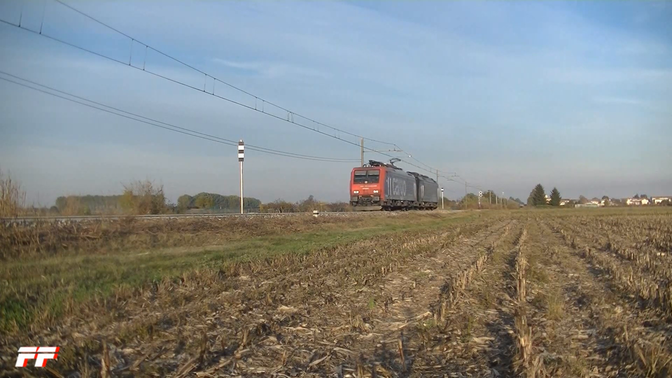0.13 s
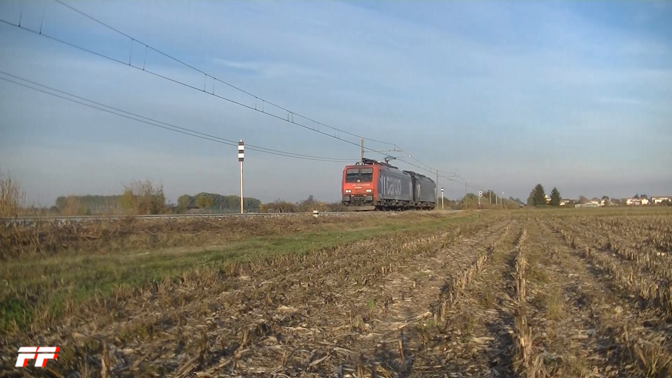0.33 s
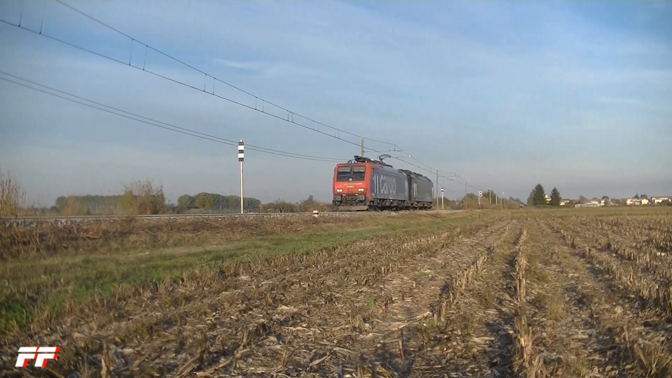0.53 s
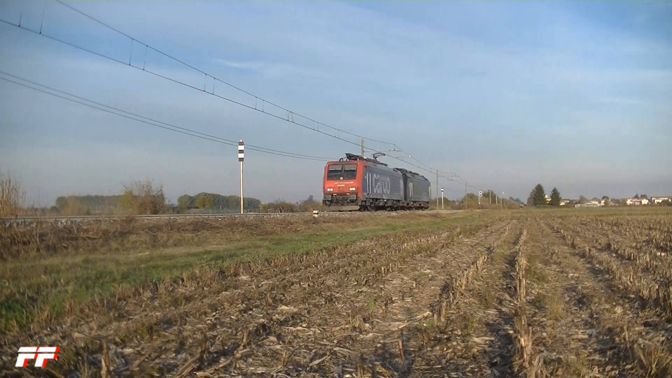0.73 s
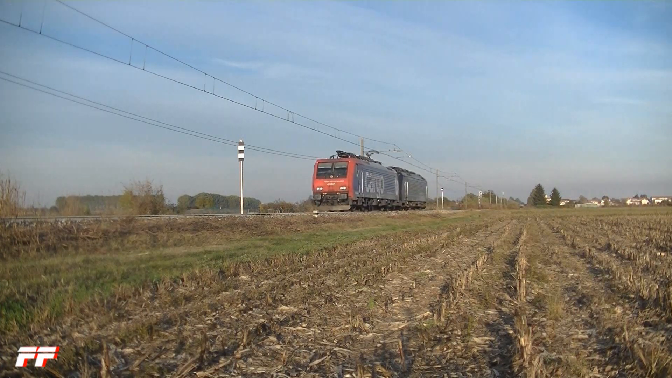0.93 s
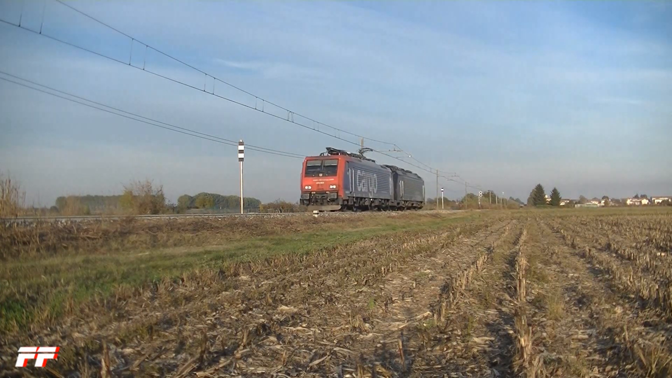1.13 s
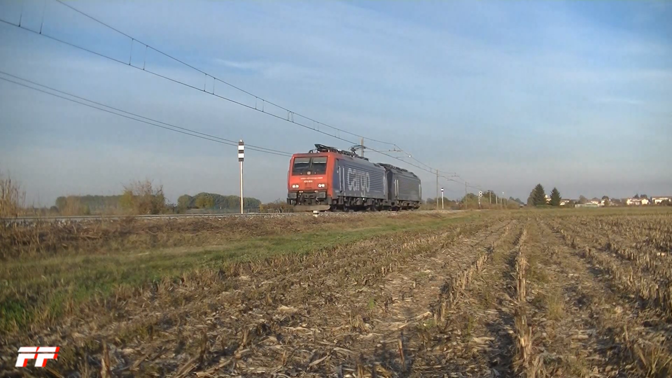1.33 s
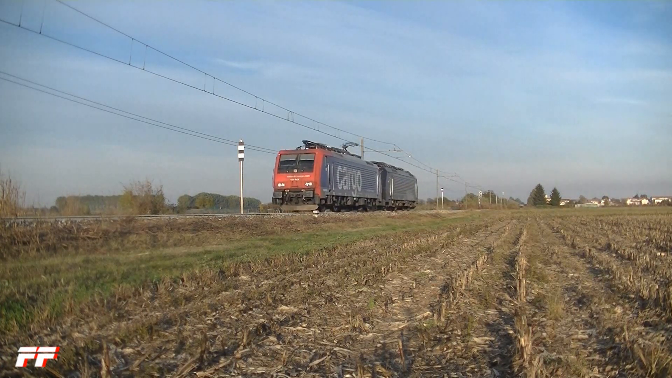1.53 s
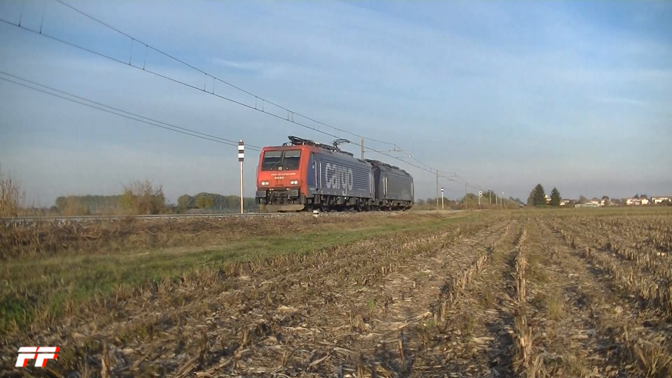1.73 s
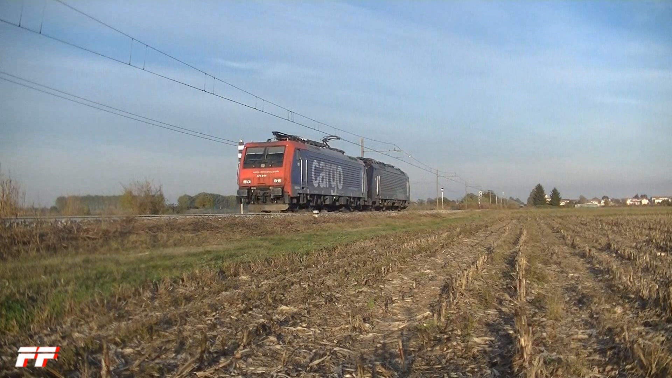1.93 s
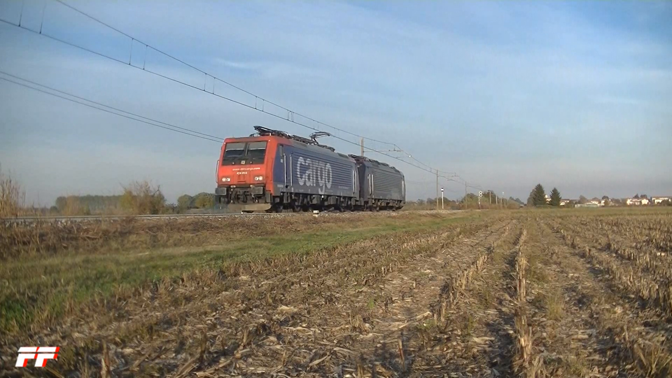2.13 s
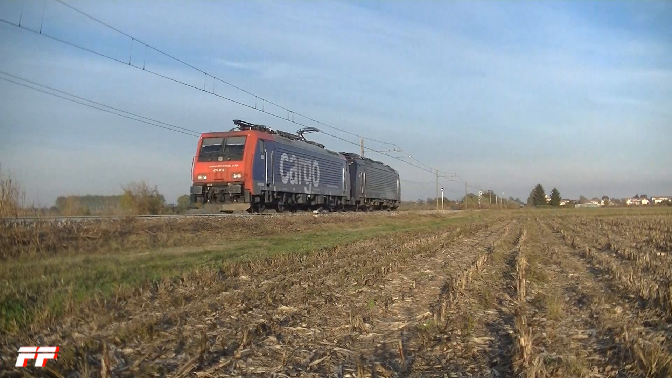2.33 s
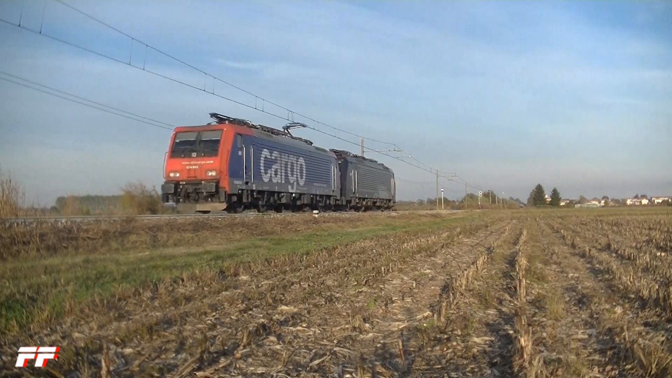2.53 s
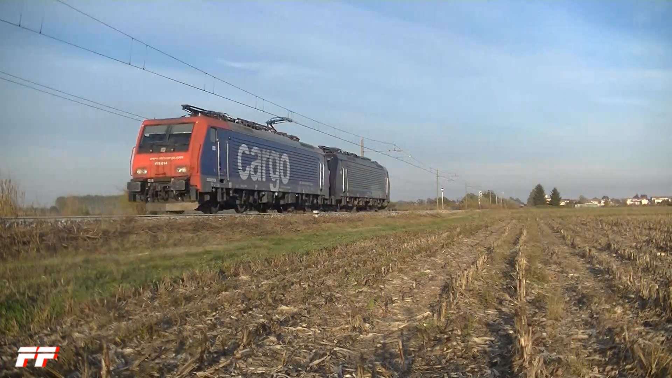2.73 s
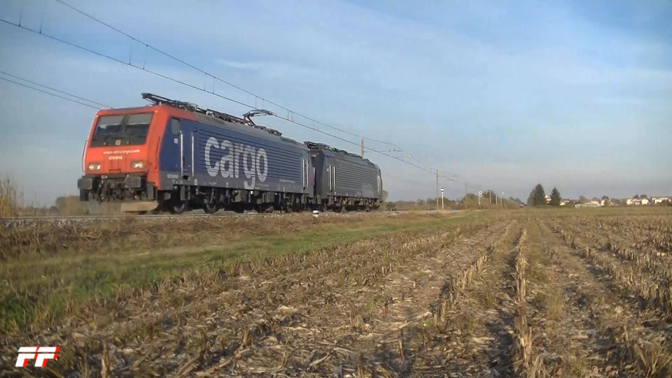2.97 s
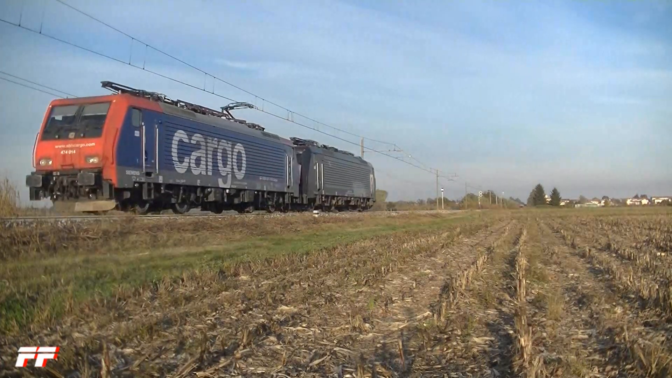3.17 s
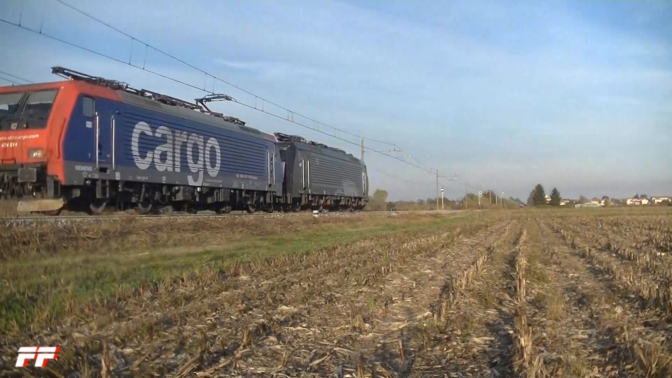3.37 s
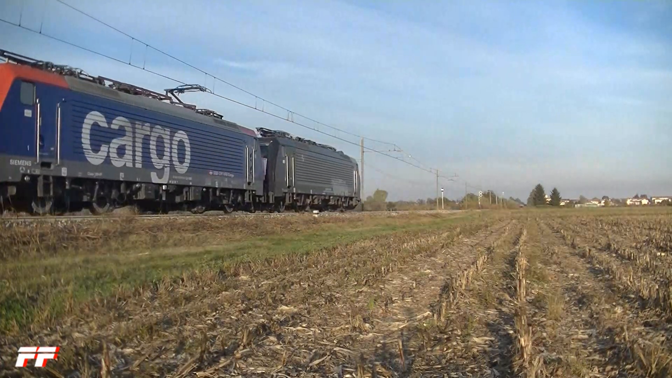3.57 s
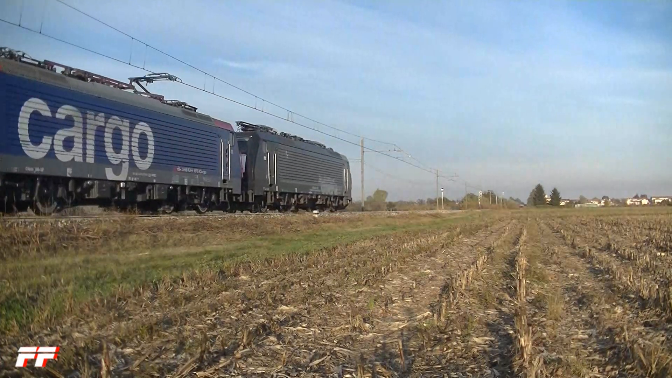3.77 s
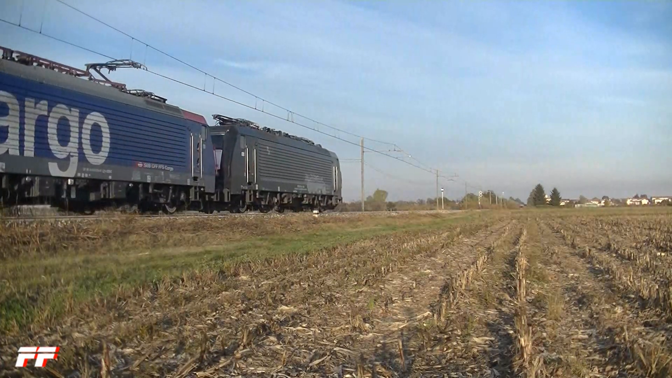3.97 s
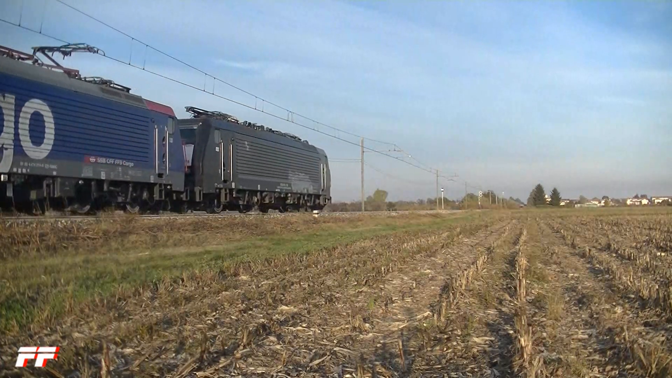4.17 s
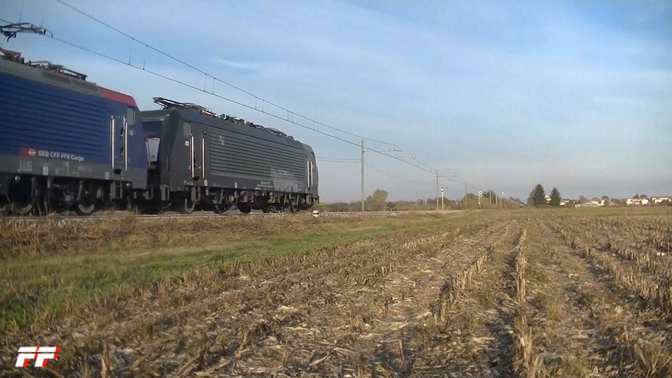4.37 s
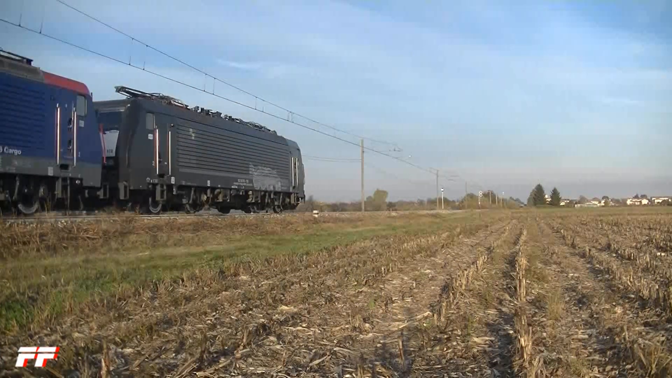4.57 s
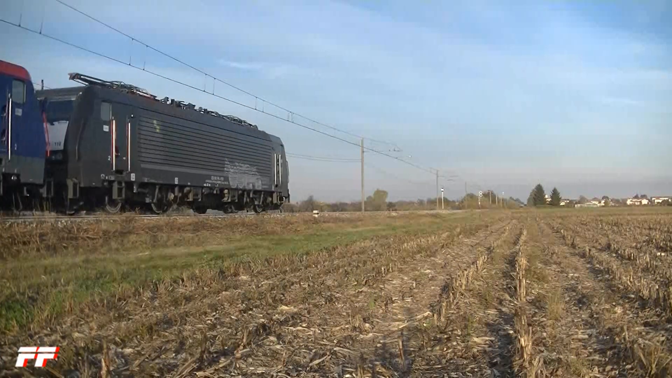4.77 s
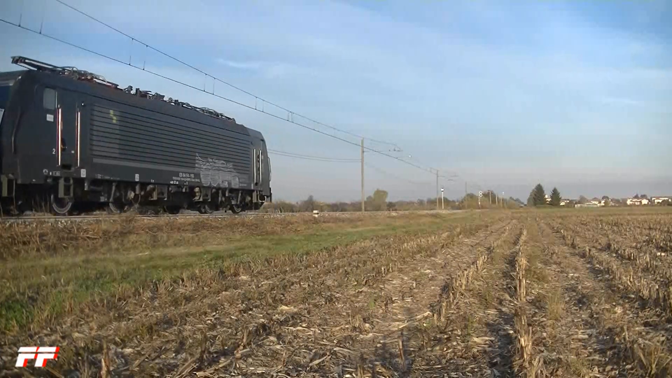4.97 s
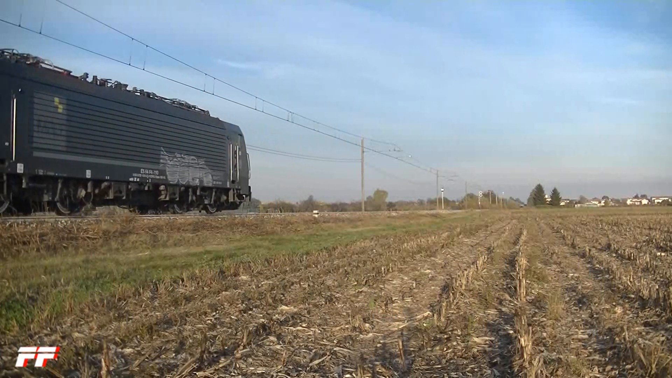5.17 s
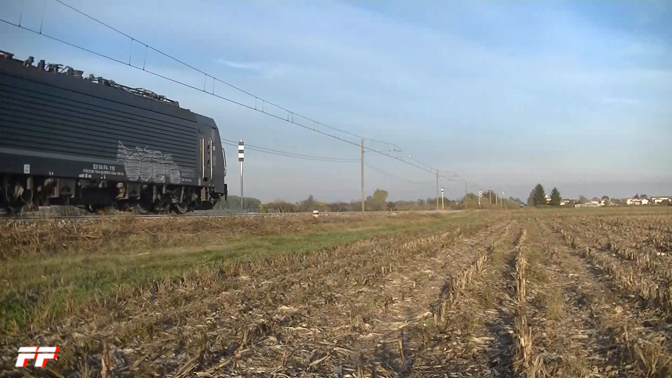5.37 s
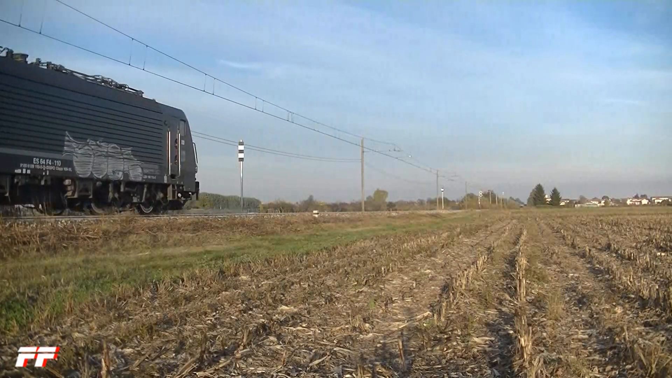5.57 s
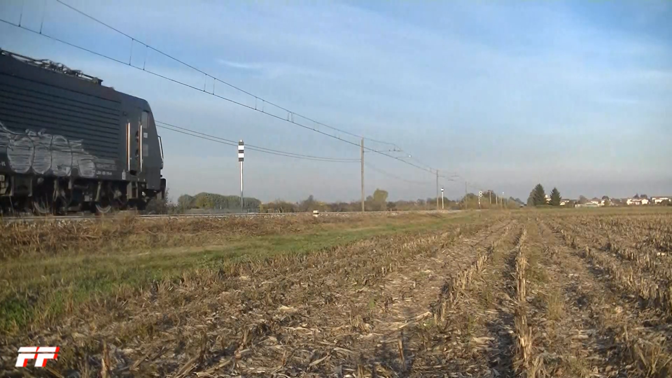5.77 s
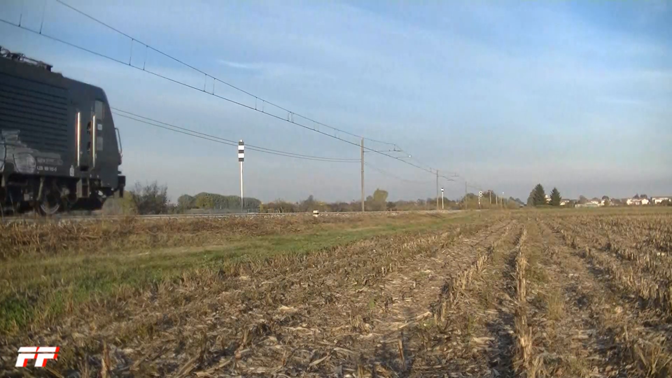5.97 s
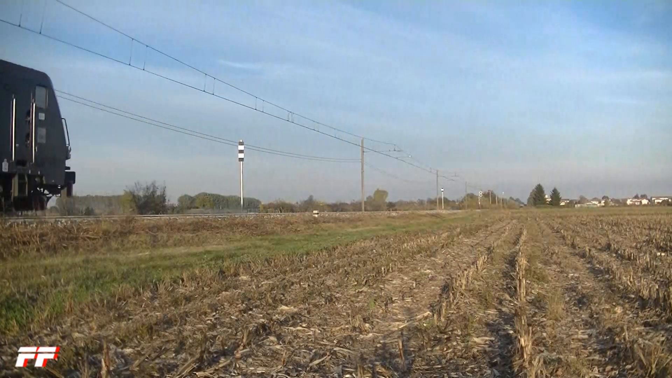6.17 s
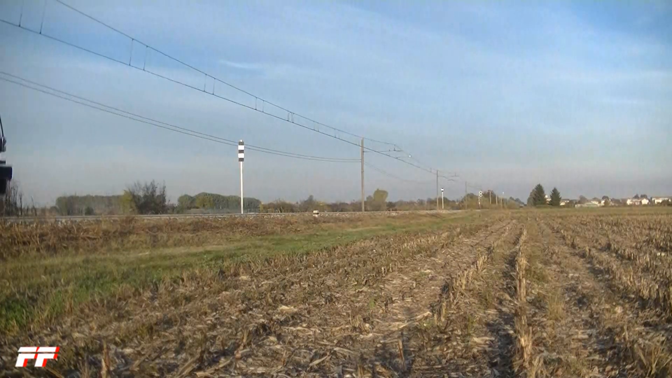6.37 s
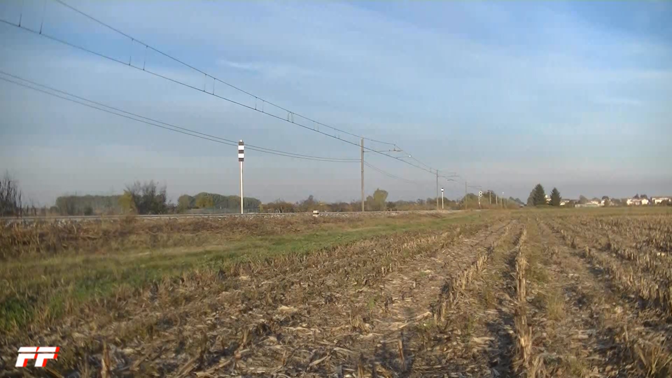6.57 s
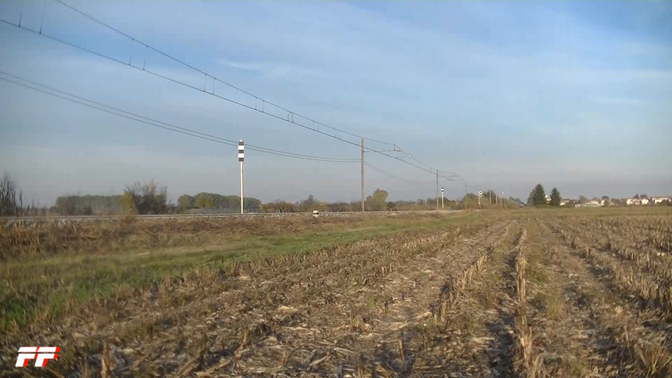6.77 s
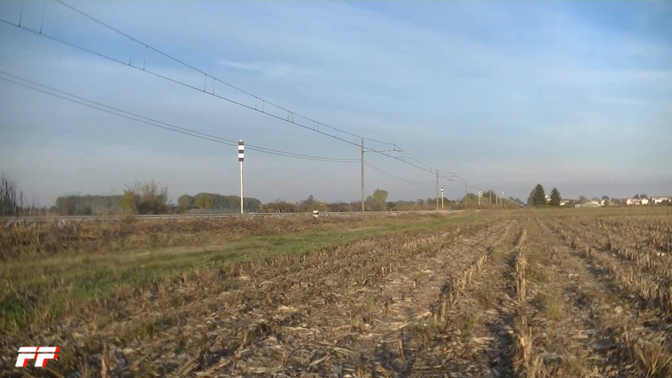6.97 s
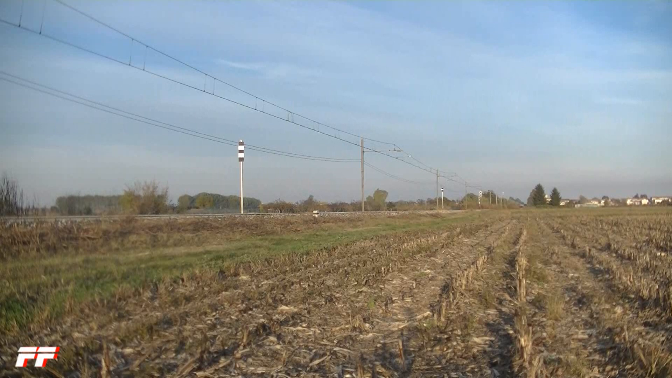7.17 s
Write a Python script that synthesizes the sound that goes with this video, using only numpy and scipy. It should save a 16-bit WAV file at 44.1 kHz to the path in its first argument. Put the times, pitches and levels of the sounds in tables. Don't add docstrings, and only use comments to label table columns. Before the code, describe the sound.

In an open field beside a railway, a fixed close stereo pair starts almost quiet, with faint hiss and a distant, fluttering electric whine straight ahead. From 0 to 3 seconds the blower tones, roughly one to two-and-a-half kilohertz, grow unevenly while a bright, airy rolling roar rises beneath. Between 3 and 5 seconds the roar swells strongly and swings left; a second, slightly detuned blower joins around 4. The first whine slides down in pitch around 4.9 seconds, the second around 5.8, both shimmering through broad wheel, rail and cooling-air noise. Faint bright ticks come at 5.4 and 5.6, then a hard steel jolt and rattle at 6.2, with a small afterclick. The first blower fades out after 6.3; the lower second whine and a fuller, darker roar continue at far left, easing slightly until the end near 7.2.

```python
import sys
import numpy as np
from scipy import signal
from scipy.fft import rfft, irfft, next_fast_len
from scipy.io import wavfile

SR = 44100
rng = np.random.default_rng(int(sys.argv[2]) if len(sys.argv) > 2 else 0)


def log_audio(samples):
    frames = np.atleast_2d(samples).T
    limited = np.clip(frames, -1, 1)
    pcm = np.round(limited * 32767).astype(np.int16)
    wavfile.write(sys.argv[1], SR, pcm)


def voltage_ratio(decibels):
    exponent = np.asarray(decibels, float) / 20
    return 10 ** exponent


N = 317961
T = np.arange(N) / SR
SIZE = next_fast_len(N)
HZ = np.arange(SIZE // 2 + 1) * SR / SIZE

SPEED_MS, TRACK_M, SOUND_MS = 13.5, 14, 343
LEAD_PASS_S, LEAD_SHAFT_HZ = 4.85, 87.0
REAR_PASS_S, REAR_SHAFT_HZ = 5.8, 86.7
NOSE_S, FLANK_S, TAIL_S = 2.8, 4.9, 6.7
HISS_DB = -71
# time_s, blade_tone_db, order_22_db, order_26_db, other_orders_db
LEAD_BLOWER = [(0.0, -77, -83, -71, -68), (0.12, -77, -72, -72, -65), (0.25, -80, -65, -67, -65),
               (0.37, -70, -69, -68, -65.5), (0.5, -73, -71, -72, -67), (0.62, -73, -72, -75, -65),
               (0.75, -68, -75, -82, -68), (0.87, -75, -81, -63, -66), (1.0, -85, -84, -63, -65),
               (1.12, -69, -70, -84, -64.5), (1.25, -65, -67, -67, -60.5), (1.37, -65, -60, -65, -61.5),
               (1.5, -68, -64, -72, -65), (1.62, -72, -69, -62, -64), (1.75, -69, -65, -57, -61.5),
               (1.87, -75, -60, -65, -59.5), (2.0, -71, -61, -66, -59.5), (2.12, -59.5, -61, -60, -59),
               (2.25, -61, -64, -50, -58.5), (2.37, -67, -61, -58, -59), (2.5, -59, -54, -52, -56),
               (2.62, -63, -55, -54, -57.5), (2.75, -63, -56, -50, -52.5), (2.87, -56, -52, -55, -55),
               (3.0, -52, -57, -49, -54.5), (3.12, -53, -67, -58, -53.5), (3.25, -62, -58, -42, -53.5),
               (3.37, -55.5, -52, -65, -52), (3.5, -52.5, -54, -55, -49.5), (3.62, -48.5, -54, -55, -49.5),
               (3.75, -52, -52, -47, -47), (3.87, -43.5, -46, -41.5, -50.5), (4.0, -46, -50, -46, -50),
               (4.12, -55, -53, -53, -47.5), (4.25, -46.5, -54, -40, -47.5), (4.37, -53, -54, -48, -52),
               (4.5, -40.5, -55, -51, -48), (4.62, -46, -60, -45, -45), (4.75, -54, -56, -41.5, -45.5),
               (4.87, -50, -52, -51, -47), (5.0, -43.5, -54, -56, -46.5), (5.12, -48, -59, -47, -53),
               (5.25, -53, -50, -57, -47), (5.37, -49, -48, -49, -45), (5.5, -45, -50, -53, -43.5),
               (5.62, -42, -44.5, -59, -45), (5.75, -54, -48, -55, -44), (5.87, -40.5, -44, -52, -49),
               (6.0, -55, -52, -64, -52), (6.12, -45, -59, -66, -51), (6.25, -54, -64, -62, -41.5)]
REAR_BLOWER = [(4.0, -42, -52, -49, -50), (4.12, -51, -53, -47, -53), (4.25, -44, -59, -49, -50),
               (4.37, -55, -62, -56, -45.5), (4.5, -50, -65, -43, -46), (4.62, -49, -53, -53, -48),
               (4.75, -44, -53, -56, -42), (4.87, -41.5, -49, -45, -46), (5.0, -47, -43, -40.5, -42.5),
               (5.12, -42, -48, -50, -45), (5.25, -41, -52, -55, -43.5), (5.37, -49, -59, -48, -43.5),
               (5.5, -42, -57, -51, -45), (5.62, -42, -52, -57, -44), (5.75, -43, -49, -70, -40.5),
               (5.87, -42.5, -56, -60, -46.5), (6.0, -49, -52, -65, -44.5), (6.12, -44, -44, -65, -45),
               (6.25, -48, -49, -53, -44), (6.37, -40.5, -46.5, -61, -43.5), (6.5, -41.5, -51, -58, -45.5),
               (6.62, -42.5, -56, -55, -46), (6.75, -41.5, -55, -52, -45), (6.87, -44.5, -63, -53, -43),
               (7.0, -51, -53, -57, -45), (7.12, -50, -62, -60, -45)]
# shaft_multiple, level_db, smear_hz
SHAFT_ORDERS = [(3, -13.5, 30), (6, -18, 25), (9, -12.5, 30), (13, -15, 4), (17, -14, 3), (18, -14, 3),
                (19, -13.5, 3), (20, -9.5, 3), (21, -5.5, 3), (23, -7, 3), (24, -3.5, 6), (25, -5.5, 4),
                (32, -13, 6), (36, -12, 20), (37, -12, 4), (48, -13.5, 4), (51, -16, 4)]
# time_s, level_db, extra_rumble_db, extra_hiss_db
ROAR_LEVEL = [(0.0, -56.5, 0, 0), (1.61, -50, 0, 0), (2.33, -46, 0, 0), (3.47, -40, 0, 0),
              (3.84, -37.5, 0, 0), (5.02, -31, 0, 0), (5.28, -31, 0, 0), (5.68, -30.5, 0, 0),
              (6.2, -33, 0, 0), (6.24, -29.5, 0, 0), (6.3, -34, 0, 0), (6.85, -33, 0, 0),
              (7.21, -34.5, 0, 0)]
# time_s, bearing (0 ahead to 1 far left)
TRAIN_BEARING = [
    (0, 0),
    (3, .1),
    (4, .35),
    (5, .7),
    (6, 1),
    (7.21, .95),
]
# frequency_hz, level_db (per Hz)
NOSE_COLOUR = [(24, -82), (40, -52), (69, -53), (156, -19.5), (262, -20.5), (432, -20.5), (933, -13.5),
               (1070, -6.5), (1370, -13), (2260, 0.5), (2710, -12.5), (4460, -7.5), (6260, -29.5),
               (8040, -26.5), (9000, -43), (11700, -73), (19800, -120)]
FLANK_COLOUR = [(24, -79), (40, -53), (70, -44.5), (204, -17), (245, -11), (432, -16.5), (650, -17),
                (779, -11), (872, -16.5), (1050, -0.5), (1340, -14.5), (2210, 2), (2470, -6), (4560, -13),
                (9000, -35), (11700, -68), (19800, -120)]
TAIL_COLOUR = [(24, -78), (40, -55), (101, -28.5), (245, -7), (386, -8.5), (452, -17), (744, -6),
               (872, -10), (999, -3.5), (1140, -8.5), (2060, -4), (3170, -7.5), (5220, -17.5),
               (7180, -24.5), (9000, -39), (11700, -69), (19800, -120)]
# frequency_hz, level_db
MIC_TOP = [(4120, -30), (7000, 1), (7670, 4.5), (8770, -7.5), (10600, -8), (12100, -16.5), (16200, -27)]
# start_s, level_db, centre_hz, width_hz, rise_s, decay_s
JOINT_HITS = [
    (5.40, -46, 6500, 5000, .004, .015),
    (5.61, -43, 6500, 5000, .006, .02),
    (6.217, -32, 3000, 2500, .002, .005),
    (6.230, -30, 2600, 3000, .002, .02),
    (6.245, -30.5, 2600, 4000, .001, .012),
    (6.345, -40, 8000, 5000, .008, .03),
]
# frequency_hz, ahead_left_minus_right_db, far_left_left_minus_right_db, far_left_left_lead_rad,
# ahead_unrelated_share, far_left_unrelated_share
PORT_PAIR = [(60, -1, 3, -1, .3, .1), (200, -1, -.5, -1.45, .03, .01), (640, 0, -1, -0.6, .04, .08),
             (1300, 0, 1.5, 0.13, .03, .15), (2300, -2, 5.5, 0.22, .03, .2),
             (3600, -3.5, 5.5, 0.33, .04, .2), (5000, -2, -1.5, .6, .08, .3), (7000, 4, 7.5, -1.3, .15, .4),
             (8600, 1.5, -4.5, -2.5, .3, .5), (14000, -5, 1.5, 4, .5, .8)]
# frequency_hz, level_db (per Hz)
HISS_COLOUR = [(18, -59), (30, -28), (180, -15), (289, -9), (689, -4), (766, -11), (2310, -10), (7570, -15),
               (16200, -22)]


def on_log(table, hz):
    at, *columns = np.transpose(table)
    log_hz = np.log(np.maximum(hz, 1))
    return [np.interp(log_hz, np.log(at), column) for column in columns]


def in_time(table):
    time_s, *columns = np.transpose(table)
    return [np.interp(T, time_s, column) for column in columns]


def walk(rate_hz):
    knots = rng.standard_normal(1600)
    return 1.22 * np.interp(T * rate_hz + rng.random(), np.arange(1600), knots)


def band(hz, octaves):
    lo, hi = (int(min(hz * 2 ** edge, SR / 2) * SIZE / SR) for edge in (-octaves, octaves))
    shape = np.cos(np.pi / 2 * np.log2(HZ[lo:hi] / hz) / octaves)
    noise = rng.standard_normal((2, hi - lo)) + 1j * rng.standard_normal((2, hi - lo))
    bins = np.zeros((2, SIZE), np.complex64)
    bins[:, lo:hi] = shape * noise
    return np.fft.ifft(bins)[:, :N] * SIZE / np.sqrt(np.sum(shape ** 2))


def ports(direct, scattered, hz, bearing):
    db_ahead, db_left, lead_rad, share_ahead, share_left = on_log(PORT_PAIR, hz)
    share = np.clip(share_ahead + bearing * (share_left - share_ahead), 0, 1) / 2
    mid = np.sqrt(1 - share) * direct
    side = np.sqrt(share) * scattered
    step = voltage_ratio((db_ahead + bearing * (db_left - db_ahead)) / 2)
    turn = np.exp(.5j * lead_rad * bearing)
    left = step * turn * (mid + side)
    right = (mid - side) / (step * turn)
    return np.array([left.real, right.real])


def blower(table, pass_s, shaft_hz, bearing):
    ahead_m = SPEED_MS * (pass_s - T)
    approach_ms = SPEED_MS * ahead_m / np.hypot(ahead_m, TRACK_M)
    turns = np.cumsum(shaft_hz * (1 + approach_ms / SOUND_MS)) / SR
    start_s, end_s = table[0][0], table[-1][0]
    fade = np.clip(np.minimum(T - start_s + .2, end_s + .2 - T) / .2, 0, 1)
    blade_db, db22, db26, rest_db = in_time(table)
    lines = [(12, blade_db, 14, .6), (22, db22, 5, .4), (26, db26, 5, .4)]
    lines += [(order, rest_db + db, smear_hz, .8) for order, db, smear_hz in SHAFT_ORDERS]
    out = 0
    for order, db, smear_hz, rough in lines:
        direct, scattered = [np.sqrt(1 - rough) + np.sqrt(rough / 2) * (walk(smear_hz) + 1j * walk(smear_hz))
                             for _ in range(2)]
        tone = np.sqrt(2) * voltage_ratio(db) * np.exp(2j * np.pi * (order * turns + rng.random()))
        out = out + ports(tone * direct, 1j * tone * scattered, order * shaft_hz, bearing)
    return fade * out


def roar(bearing):
    level_db, rumble_db, hiss_db = in_time(ROAR_LEVEL)
    swell = walk(3)
    out = 0
    for hz in 40 * 2 ** np.arange(0, 8.8, .25):
        colour = [on_log(side, min(hz, 7000))[0] for side in (NOSE_COLOUR, FLANK_COLOUR, TAIL_COLOUR)]
        db = level_db + np.interp(T, [NOSE_S, FLANK_S, TAIL_S], colour)
        db += 10 * np.log10(hz) - 39.5
        db += rumble_db * np.clip(np.log2(900 / hz), 0, 1)
        db += hiss_db * np.clip(np.log2(hz / 2500), 0, 1)
        db += .5 * swell + .6 * walk(9)
        out = out + voltage_ratio(db) * ports(*band(hz, .25), hz, bearing)
    return out


def clatter(bearing):
    out = 0
    for start_s, db, hz, width_hz, rise_s, decay_s in JOINT_HITS:
        after_s = np.maximum(T - start_s, 0)
        jolt = (1 - np.exp(-after_s / rise_s)) * np.exp(-after_s / decay_s)
        out = out + voltage_ratio(db) * jolt * ports(*band(hz, width_hz / hz), hz, bearing)
    return out


def microphone_hiss():
    white = rng.standard_normal((2, SIZE))
    hiss = irfft(rfft(white) * voltage_ratio(on_log(HISS_COLOUR, HZ)[0]), SIZE)[:, :N]
    return voltage_ratio(HISS_DB) * hiss / hiss.std()


def scene():
    bearing, = in_time(TRAIN_BEARING)
    lead = blower(LEAD_BLOWER, LEAD_PASS_S, LEAD_SHAFT_HZ, bearing)
    rear = blower(REAR_BLOWER, REAR_PASS_S, REAR_SHAFT_HZ, bearing)
    return lead + rear + roar(bearing) + clatter(bearing)


def roll_off(x):
    return signal.sosfilt(signal.butter(12, 16400, fs=SR, output="sos"), x)


def record(dry):
    top = voltage_ratio(on_log(MIC_TOP, np.maximum(HZ, 7000))[0])
    heard = irfft(rfft(dry, SIZE) * top, SIZE)[:, :N]
    mix = heard + microphone_hiss()
    return roll_off(mix)


dry = scene()
out = record(dry)
log_audio(out)
```